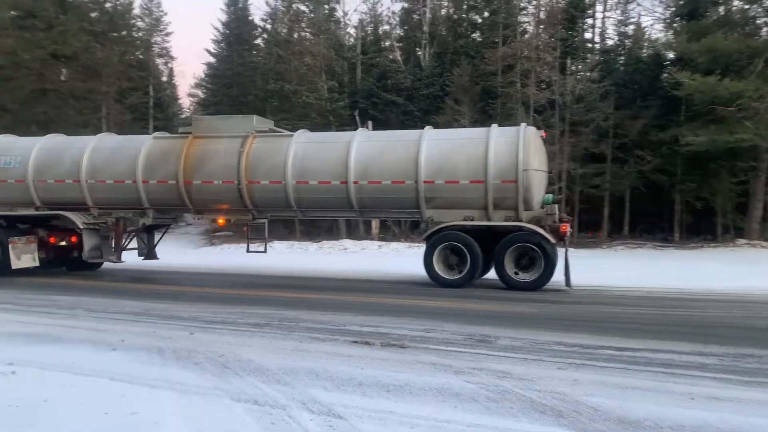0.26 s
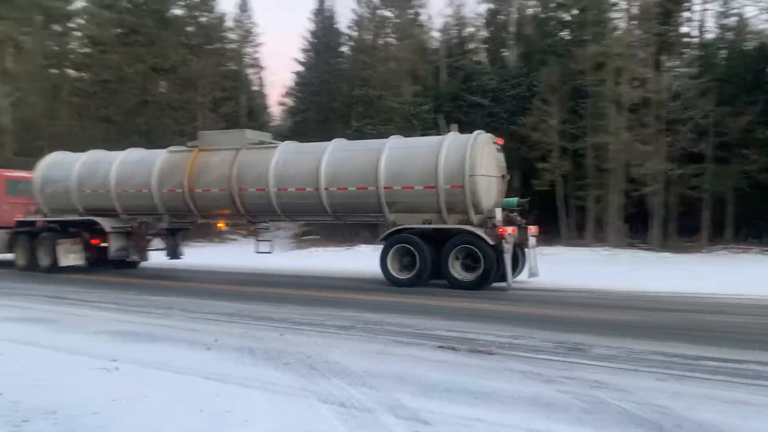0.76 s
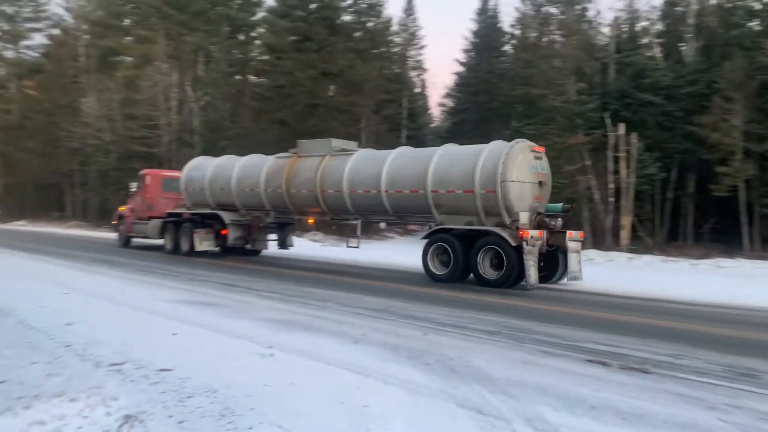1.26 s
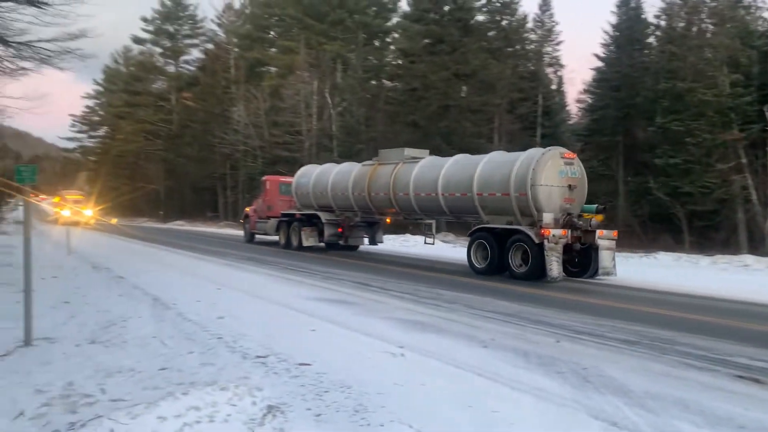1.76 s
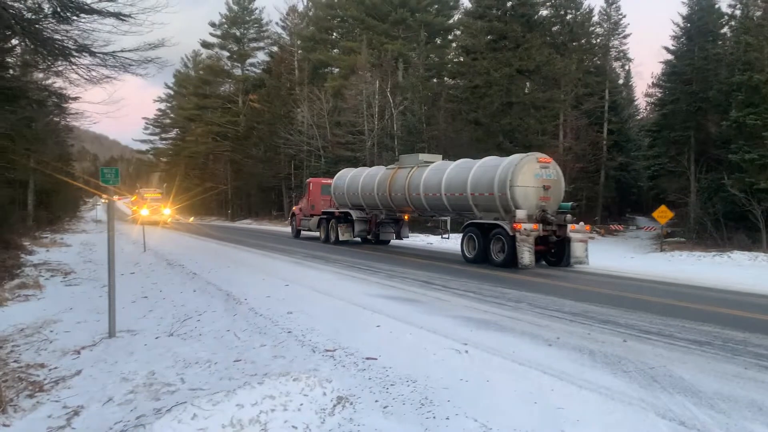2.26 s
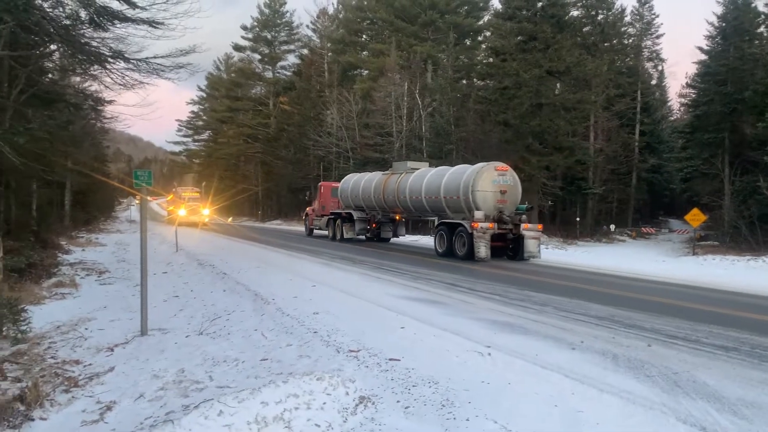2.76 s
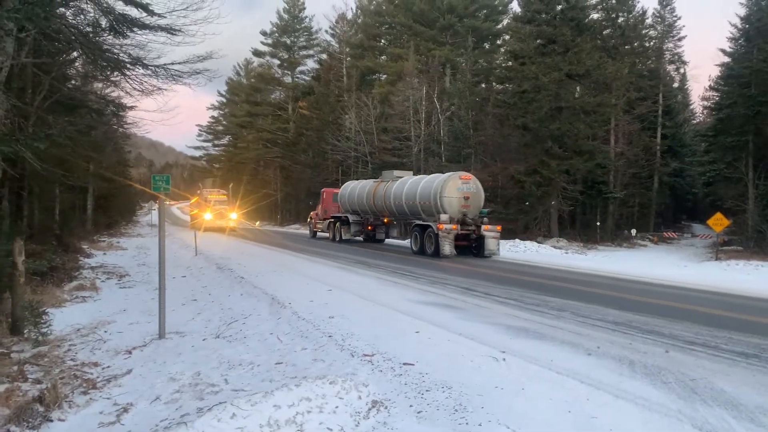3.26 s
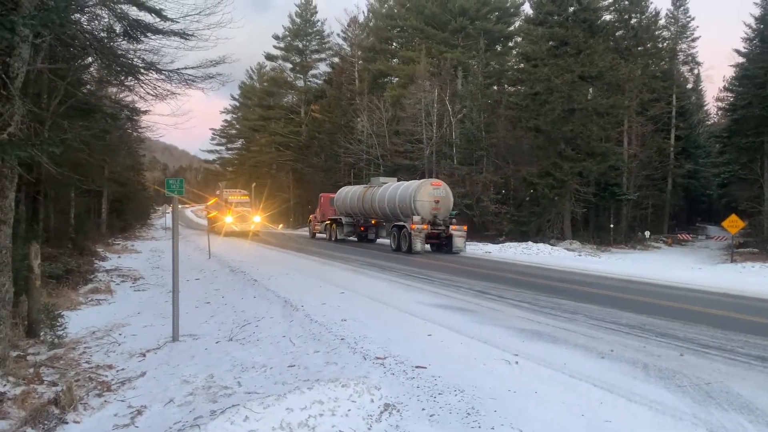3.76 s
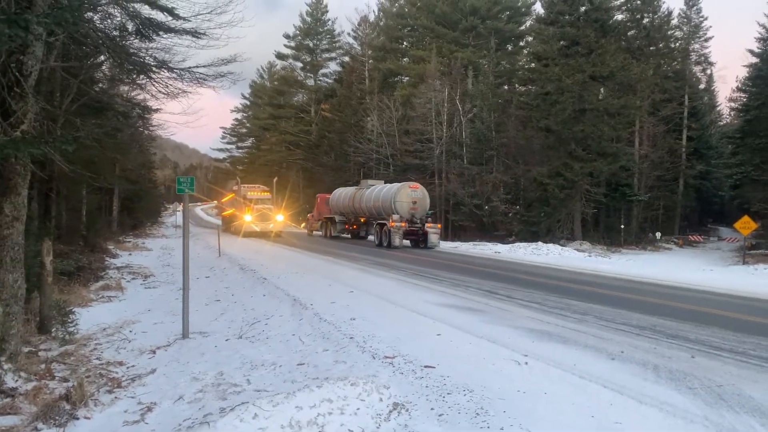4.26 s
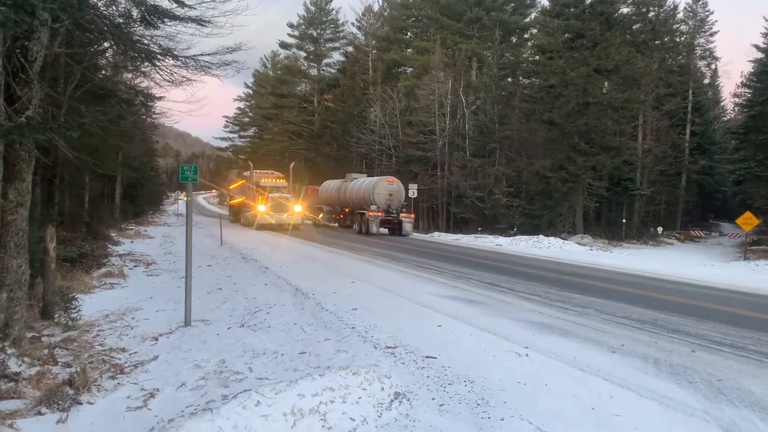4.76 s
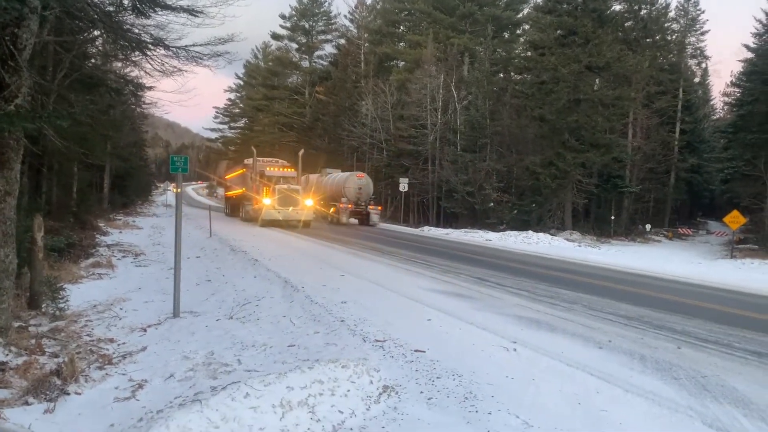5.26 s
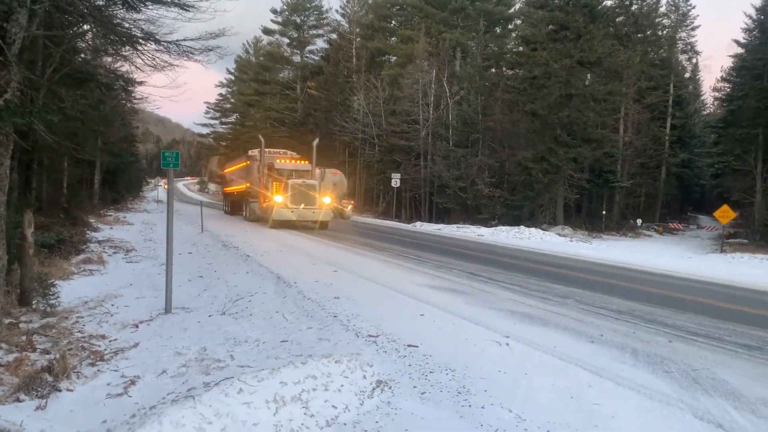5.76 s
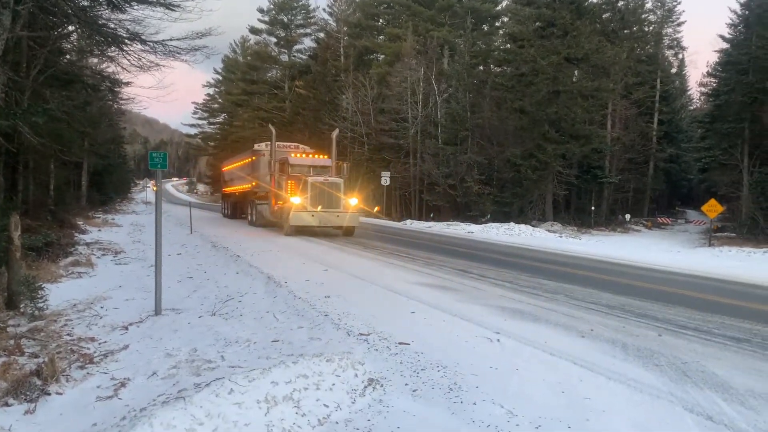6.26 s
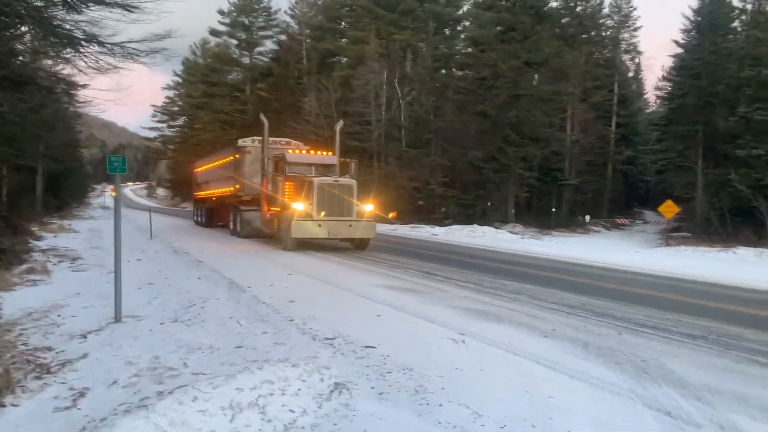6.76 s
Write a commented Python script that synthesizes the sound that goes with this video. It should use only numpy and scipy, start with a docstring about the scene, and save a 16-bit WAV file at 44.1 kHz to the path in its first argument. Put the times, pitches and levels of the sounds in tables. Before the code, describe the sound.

Tyre roar and slush hiss from a departing diesel truck give way to the loud, uneven hammering of another truck's engine brake.

```python
"""Two diesel trucks on a slushy forest road

A tanker pulls away while a second truck approaches on its engine brake: first a far drone, then a close,
uneven hammering as its cylinders dump compressed air into the resonant exhaust stack. Tyres roar and
throw slush. The two microphone ports of a phone hear the road with unlike colour and phase."""
import sys
import numpy as np
from scipy import signal
from scipy.fft import rfft, irfft, next_fast_len
from scipy.io import wavfile
from scipy.ndimage import uniform_filter1d, map_coordinates

SR = 44100
rng = np.random.default_rng(int(sys.argv[2]) if len(sys.argv) > 2 else 0)


def store_pcm(level_fs):
    """Save levels as 16-bit WAV."""
    pcm = np.round(np.clip(level_fs, -1, 1) * 32767).astype(np.int16)
    wavfile.write(sys.argv[1], SR, np.atleast_2d(pcm).T)


N = 308700
TIME = np.arange(N) / SR
BRAKE_START_S, BRAKE_END_S = 5.006, 6.825

# Deep thuds from the stack. Each row: start in seconds, peak in dB.
STACK_THUDS = [(5.3545, -5), (5.735, -6)]
# Spectrum of thrown slush. Each row: frequency in Hz, left and right density in relative dB.
SLUSH_SPECTRUM = [(20, -41.5, -68.5), (2490, -27, -18), (3340, -28, -14.5), (4030, -37, -18.5),
                  (4470, -24.5, -15), (5280, -23.5, -11), (5620, -31, -14), (6590, -21, -15.5),
                  (7420, -48, -29), (8460, -38.5, -37.5), (9600, -41, -55.5), (10050, -47.5, -63),
                  (10700, -68, -72)]
# Level difference between the ports. Each row: frequency in Hz, left minus right in dB.
PORT_TILT = [(60, 2.5), (110, 1.5), (190, -1.0), (340, -2.5), (600, -0.5), (1070, -5.0), (1900, -11.5),
             (3370, -11.5), (5990, -10.5), (10600, -2.5)]


def engine_brake():
    """Compression release: six cylinders vent in turn, ever more slowly. Gives hammering and rough air."""
    # The sharpest cylinder barks once a cycle. Each row: start in seconds, level in dB, pitch in Hz.
    barks = [(5.1064, -22.5, 663), (5.2237, -23, 650), (5.3426, -20, 667), (5.4613, -23.5, 706),
             (5.5857, -23, 727), (5.7058, -21.5, 722), (5.8327, -24.5, 690), (5.9588, -20, 637),
             (6.0896, -21, 685), (6.2236, -14.5, 595), (6.3571, -16.5, 590), (6.4948, -18, 587),
             (6.6371, -18.5, 594), (6.7857, -17, 600)]
    bark_s = np.transpose(barks)[0]
    cycles = np.polyval(np.polyfit(bark_s, np.arange(len(barks)), deg=3), TIME)
    active = TIME > 4.9
    envelope = gate(BRAKE_START_S, BRAKE_END_S, db=-17.5, attack_s=.0074, release_db_per_s=82.5)
    envelope *= amp(.72 * wobble(6.9))
    for s, _ in STACK_THUDS:  # the hammering falters at each thud
        envelope *= amp(-6 * np.exp(-((TIME - s - .01) / .02) ** 2))
    air = exhaust_air(cycles, envelope)
    blows, snaps = cylinder_blows(barks, cycles[active], TIME[active])
    boom = filtered(-blows, stack_response)
    return amp(2) * envelope * boom / np.std(boom[active]) + snaps, air


def cylinder_blows(barks, cycles, times):
    """Impulse excitation: each release is a pressure step with a snap. Gives impulses and snaps."""
    # The six cylinders, barking one first. Each row: delay in cycles, strength in relative dB.
    cylinders = [(0, 0.5), (-.032, 4), (-.034, -1), (-.037, 2), (-.028, 3), (.03, -9.5)]
    # Snaps of the other five. Each entry: level against the mean bark in dB.
    snap_db = [-8, -12, -11, -10, -11]
    bark_s, bark_db, bark_hz = np.transpose(barks)
    blows, snaps = np.zeros(N), np.zeros(N + SR)
    for s, db, hz in barks:
        add_burst(snaps, s, hz, db, turns=2.5, glide=.1)
        add_burst(snaps, s, .6 * hz, db - .5, turns=1.43, glide=-.1)  # a lower knock under the bark
    for step in range(-5, 6 * len(barks) + 2):
        cylinder = step % 6
        delay, strength_db = cylinders[cylinder]
        louder, later, higher, jitter, harder = np.clip(rng.standard_normal(5), -2, 2)
        blow_s = np.interp(step / 6 + delay, cycles, times) - .003 + .0004 * jitter
        blows[round(blow_s * SR)] = amp(strength_db + 1.5 * harder)
        s = np.interp(step / 6, cycles, times)
        if cylinder and s < BRAKE_END_S:
            opening_db = 8 * (step < -2)  # the first blows snap harder
            db = np.mean(bark_db) + snap_db[cylinder - 1] + 2.5 * louder + opening_db
            hz = .814 * np.interp(s, bark_s, bark_hz) * np.exp(.14 * higher)
            add_burst(snaps, s + .002 * later, hz, db, turns=1.8, glide=.13)
    return blows, snaps[:N]


def stack_response(hz):
    """Modal superposition: the exhaust pipe responds as a sum of damped resonances of alternating sign."""
    # Pipe modes. Each row: frequency in Hz, bandwidth in Hz, gain in relative dB.
    modes = [(46, 8, -41), (80.5, 14.8, -33), (95.5, 8.6, -28), (124.8, 6.7, -30), (148.8, 10.4, -36.5),
             (192.7, 24, -42), (233.6, 15.9, -37), (286.5, 29.4, -49), (362, 13.4, -48.5)]
    return sum((-1) ** k * amp(db) * 1j * hz * width / (centre ** 2 - hz ** 2 + 1j * hz * width)
               for k, (centre, width, db) in enumerate(modes))


def exhaust_air(cycles, envelope):
    """Amplitude modulation: rough air leaves the stack in one puff per cylinder."""
    # Rough air in the stack. Each row: frequency in Hz, density in relative dB.
    spectrum = [(20, -26), (40, -7), (90, -1), (150, -4), (190, -7), (235, -2), (290, -13), (360, -10),
                (450, -13), (600, -15), (950, -29), (1500, -60)]
    puffs = amp(5.7 * np.cos(2 * np.pi * 6 * cycles - 1.2))
    return amp(-12) * envelope * puffs * centred_noise(spectrum, patchy_db=2)


def thuds():
    """A damped downward chirp: each heavy blow drops from a knock to a push of air."""
    track, t = np.zeros(N), np.arange(SR // 8) / SR
    envelope = (1 - np.exp(-t / .003)) * np.exp(-t / .028)
    blow = -envelope * np.sin(2 * np.pi * 1.35 * np.log(1 + t / .0035) - 2.5)
    for s, db in STACK_THUDS:
        track[round(s * SR):][:len(t)] += amp(db) * blow / blow.max()
    return track


def far_truck():
    """Engine orders fall with speed: the slowing truck drones, louder when braking, until it is close."""
    # Spells of distant braking. Each row: start in seconds, end in seconds, level in dB.
    spells = [(0.948, 1.301, -34.5), (1.592, 2.217, -30), (2.352, 2.944, -30)]
    # Partials of the drone. Each row: multiple of the cycle rate, level in relative dB.
    orders = [(6, -24), (11, -20), (12, 0), (13, -20), (18, -17), (24, -24)]
    braking = sum(gate(*spell, attack_s=.045, release_db_per_s=252) for spell in spells)
    coasting = amp(-43) * (TIME < BRAKE_START_S)
    return np.maximum(braking, coasting) * diesel_tone(orders, firing_hz=65 - 2.28 * TIME)


def tanker():
    """Firing rate sets pitch and load sets level: the tanker pulls through a gear, then eases."""
    # The engine's course. Each row: time in seconds, firing rate in Hz, level in dB.
    course = [(0, 70, -44.5), (.6, 64, -41), (1.3, 67, -41.5), (1.6, 68, -34.5), (2, 71.5, -32.5),
              (2.35, 72.4, -33), (2.55, 78.5, -33), (2.93, 81, -33.5), (3, 77, -41.5), (3.75, 87, -36),
              (3.9, 84, -49.5), (4.3, 83, -38.5), (5, 78, -37), (5.1, 65, -69)]
    # Its partials. Each row: multiple of the cycle rate, level in relative dB.
    orders = [(6, 0), (10, -7), (12, -4), (15, -10), (18, -20)]
    firing_hz, db = curves(course)
    return amp(db) * diesel_tone(orders, firing_hz)


def diesel_tone(orders, firing_hz):
    """Harmonics of a six-cylinder cycle: only the low orders carry far, each wavering a little."""
    cycles = np.cumsum(firing_hz / 6) / SR
    tone = np.zeros(N)
    for order, db in orders:
        gain = amp(db + .6 * wobble(3.306))
        tone += gain * np.cos(2 * np.pi * (order * cycles + rng.random()) + .08 * wobble(5.4))
    return unit_rms(tone)


def exhaust_blip():
    """Common onset: rough low tones start and stop together and fuse into one short blip."""
    # Exhaust tones. Each row: frequency in Hz, level in relative dB.
    partials = [(36, -17), (65, -11), (80, -10), (98, -2), (110, -9), (127, 0), (152, -7), (200, -13),
                (250, -15.5)]
    tones = sum(amp(db + 2.2 * wobble(14.7)) * np.sin(2 * np.pi * (hz * TIME + rng.random()))
                for hz, db in partials)
    return gate(.722, .91, db=-23.5, attack_s=.015, release_db_per_s=899) * unit_rms(tones)


def tyre_roar():
    """Ground reflection lowers the roar's colour as the tanker leaves; three blended spectra render it."""
    # The tanker's path. Each row: time in seconds, stage (0 alongside, 1 pulling off, 2 far).
    path = [(0, 0.02), (.7, 0.092), (1.05, 0.42), (1.3, 0.98), (1.55, 1.52), (1.9, 2), (7, 1.85)]
    # Roar at each stage. Each row: frequency in Hz, left and right density in relative dB.
    alongside = [(20, -66, -57), (59, 9, -5), (130, 6.5, 8.5), (300, -4, 1.5), (457, -2, 0.5),
                 (594, -2.5, -0.5), (900, -6.5, -5), (1190, -9, -3), (1610, -20, -8.5), (1990, -8.5, 1.5),
                 (2220, -17.5, -6), (2450, -42, -19), (3090, -18.5, -10.5), (3780, -31, -22.5),
                 (4540, -36, -25), (5200, -25, -11), (5900, -40, -34), (10800, -71, -71.5)]
    pulling_off = [(20, -64.5, -60), (60, 5.5, -3), (129, 3.5, 3.5), (300, -1.5, 1.5), (430, -7, -2),
                   (600, -3.5, -3), (910, -7, 0), (1140, -11.5, -9), (1410, -15, -7.5), (1610, -13.5, 3),
                   (1950, -14.5, -6.5), (2200, -19, -13), (2450, -32, -17.5), (3100, -28, -18),
                   (3780, -29.5, -17.5), (10800, -72, -68)]
    distant = [(20, -50.5, -54), (58, 6.5, -2), (130, 5, 5.5), (248, -8, -1.5), (410, -8.5, -8.5),
               (530, 0, -1), (902, -8, -2.5), (1068, -13.5, -13), (1430, -13, 0), (1825, -21.5, -10),
               (2070, -16, -7.5), (2270, -35.5, -12.5), (3470, -21, -15.5), (3770, -32, -28),
               (10800, -59.5, -84)]
    # Strength of the tread roar. Each row: time in seconds, level in dB.
    levels = [(0, -25.5), (.15, -28.5), (1.4, -31.5), (1.85, -29.5), (2.4, -31.5), (3.1, -31), (5, -34.5),
              (5.4, -32), (7, -32.5)]
    stage = curves(path)[0]
    roar = sum(np.sqrt(np.clip(1 - abs(stage - k), 0, 1)) * sided_noise(spectrum, patchy_db=1)
               for k, spectrum in enumerate([alongside, pulling_off, distant]))
    return amp(curves(levels)[0] + .43 * wobble(9)) * roar


def rumble():
    """Low-frequency noise: wheels and engines rumble under the whole scene."""
    # Strength of the rumble. Each row: time in seconds, level in dB.
    levels = [(0, -25), (.13, -36.5), (.9, -38), (1.9, -38.5), (2.6, -40), (3.2, -38), (7, -37)]
    # Its colour. Each row: frequency in Hz, density in relative dB.
    spectrum = [(20, -33.5), (45, -13), (60, -14.5), (80, -5), (130, 9), (200, -4), (290, -3.5), (500, -33),
                (800, -58)]
    return amp(curves(levels)[0]) * centred_noise(spectrum, patchy_db=-.5)


def slush_hiss():
    """Randomly modulated noise: slush thrown by the tyres makes a flickering hiss."""
    # Strength of the hiss. Each row: time in seconds, level in dB.
    levels = [(0, -41.5), (.35, -44.5), (1.6, -46), (3.6, -45), (5.2, -43), (5.95, -43), (6.45, -40),
              (7, -41.5)]
    flicker_db = .42 * wobble(12) + .53 * wobble(35)
    return amp(curves(levels)[0] + flicker_db) * sided_noise(SLUSH_SPECTRUM, patchy_db=1.2)


def splashes():
    """Noise under Gaussian envelopes: wheels hit deeper slush and raise ragged swells with fine spray."""
    # Each row: centre in seconds, half length in seconds, slush peak in dB, spray peak in dB.
    hits = [(1.18, .03, -48.5, -73), (3.21, 0.04, -43, -59), (3.888, 0.078, -41, -71),
            (4.7, 0.11, -43, -70), (5.06, .04, -46, -70), (6.117, .05, -45.5, -69)]
    # Fine spray. Each row: frequency in Hz, density in relative dB.
    spray_spectrum = [(5000, -30), (6500, 2), (8000, -0.5), (9600, -9), (10500, -37)]
    s, half_s, slush_db, spray_db = np.transpose(hits)[..., None]
    swells = np.exp(-((TIME - s) / half_s) ** 2 / 2) * amp(1.8 * wobble(40))
    slush = (amp(slush_db) * swells).sum(0) * sided_noise(SLUSH_SPECTRUM, patchy_db=1)
    spray = (amp(spray_db) * swells).sum(0) * centred_noise(spray_spectrum, patchy_db=2)
    return slush + spray


def port_noise(spectra_db, patchy_db):
    """Partial coherence: the ports get the sum and difference of two noises with patchy gain; rms 1."""
    # Likeness of the ports. Each row: frequency in Hz, correlation from 0 to 1.
    coherence = [(30, 1), (100, 0.82), (200, 1), (420, 0.7), (620, 0.97), (1500, 0.94), (2200, 0.78),
                 (2500, 0.46), (3100, 0.64), (3700, 0.47), (5000, 0.64), (6500, 0.62), (7500, 0.18)]
    cells = signal.stft(rng.standard_normal((2, N)), nperseg=512)[2]
    patches = uniform_filter1d(rng.standard_normal(cells.shape[1:]), 6, axis=0)
    patches = unit_rms(uniform_filter1d(patches, 14, axis=1))
    pair = signal.istft(cells * amp(patchy_db * patches), nperseg=512)[1][:, :N]
    angle = lambda hz: np.arccos(log_interp(coherence, hz)) / 2
    common, opposed = filtered(pair, lambda hz: np.array([np.cos(angle(hz)), np.sin(angle(hz))]))
    ports = np.array([common + opposed, common - opposed])
    return unit_rms(filtered(ports, lambda hz: amp(spectra_db(hz))))


def sided_noise(spectrum, patchy_db):
    """Spectral shaping: noise with a colour of its own at each port."""
    return port_noise(lambda hz: [log_interp(spectrum, hz, side) for side in (1, 2)], patchy_db)


def centred_noise(spectrum, patchy_db):
    """Spectral shaping: noise of one colour, apart from the tilt between the ports."""
    return port_noise(lambda hz: log_interp(spectrum, hz) + tilt_db(hz), patchy_db)


def tilt_db(hz):
    """The level difference, split evenly into a left and a right gain."""
    half = log_interp(PORT_TILT, hz) / 2
    return np.array([half, -half])


def add_burst(track, s, hz, db, turns, glide):
    """Adds a damped oscillation of a few cycles with a soft start and a gliding pitch."""
    age = np.arange(int(turns * 3 / hz * SR)) / SR * hz / turns
    envelope = (1.5 * np.e * age) ** 2 * np.exp(-3 * age)
    phase = 2 * np.pi * turns * age * (1 + glide * (age - 1.7))
    track[round(s * SR):][:len(age)] += amp(db) * envelope * np.sin(phase)


def gate(start_s, end_s, db, attack_s, release_db_per_s):
    """A linear rise, a hold and an exponential decay."""
    rise = np.clip((TIME - start_s) / attack_s, 0, 1)
    return rise * amp(db - release_db_per_s * np.clip(TIME - end_s, 0, None))


def wobble(rate):
    """A smooth random curve, rate knots a second."""
    knots = rng.standard_normal(int(N * rate / SR) + 4)
    return map_coordinates(knots, [TIME * rate])


def filtered(x, response):
    """Linear filtering: the spectrum of x times a complex response of frequency."""
    size = next_fast_len(N + SR // 2)
    return irfft(rfft(x, size) * response(np.fft.rfftfreq(size, 1 / SR)), size)[..., :N]


def curves(rows):
    """Linear interpolation: one value per sample for each column after the time."""
    s, *columns = np.transpose(rows)
    return [np.interp(TIME, s, column) for column in columns]


def log_interp(rows, hz, column=1):
    """Interpolation of one column on a logarithmic frequency axis."""
    columns = np.transpose(rows)
    return np.interp(np.log(hz + 1), np.log(columns[0] + 1), columns[column])


def amp(db):
    return 10 ** (np.asarray(db) / 20)


def unit_rms(x):
    return x / np.sqrt(np.mean(x ** 2) + 1e-20)


def scene():
    """Superposition: engine tones reach both ports alike but for the tilt; the noises only partly alike."""
    hammering, air = engine_brake()
    engines = hammering + thuds() + exhaust_blip() + tanker() + far_truck()
    road = tyre_roar() + rumble() + slush_hiss() + splashes()
    return filtered(engines, lambda hz: amp(tilt_db(hz))) + air + road


def record(dry):
    """Phase difference between the ports, then soft saturation of the peaks and a band limit."""
    # Phase lead of the left port on top of its time lead. Each row: frequency in Hz, lead in radians.
    phase_lead = [(40, 1), (130, .85), (400, 1), (550, .7), (800, -.7), (1000, -.5), (1250, -1.8),
                  (1900, -.9), (2400, -1.8), (2650, -4.3), (3000, -6.2), (4500, -6.8), (5200, -6),
                  (7000, -6.8)]
    lead_s, ceiling, top_hz = .0004, .85, 11256
    half_lead = lambda hz: (log_interp(phase_lead, hz) + 2 * np.pi * hz * lead_s) / 2
    ports = filtered(dry, lambda hz: np.exp(1j * np.array([half_lead(hz), -half_lead(hz)])))
    rounded = ports / (1 + abs(ports / ceiling) ** 4) ** .25
    return filtered(rounded, lambda hz: hz < top_hz)


dry = scene()
out = record(dry)
store_pcm(out)
```